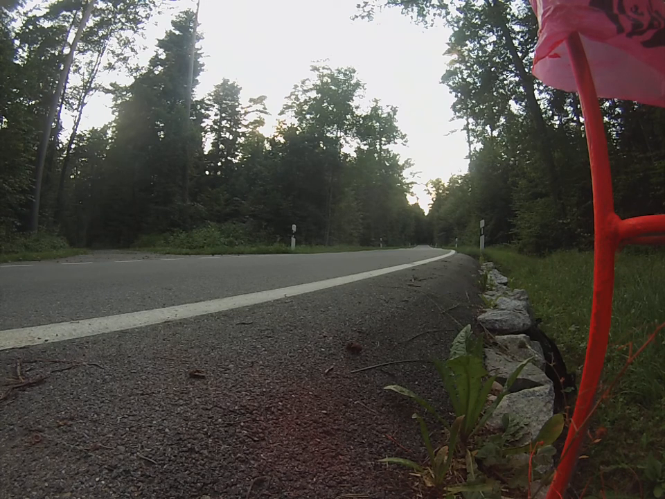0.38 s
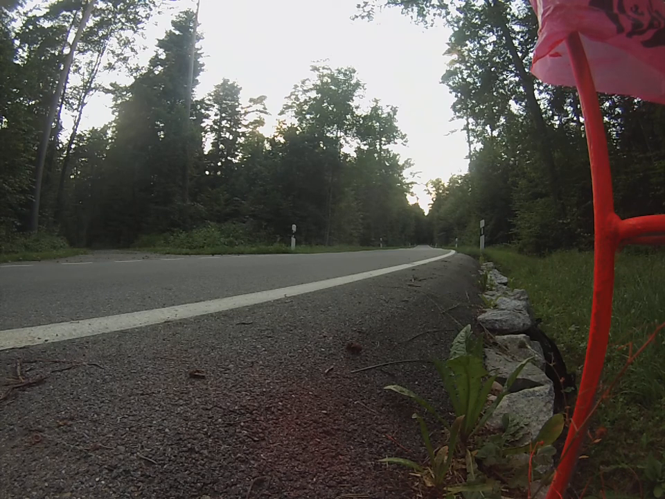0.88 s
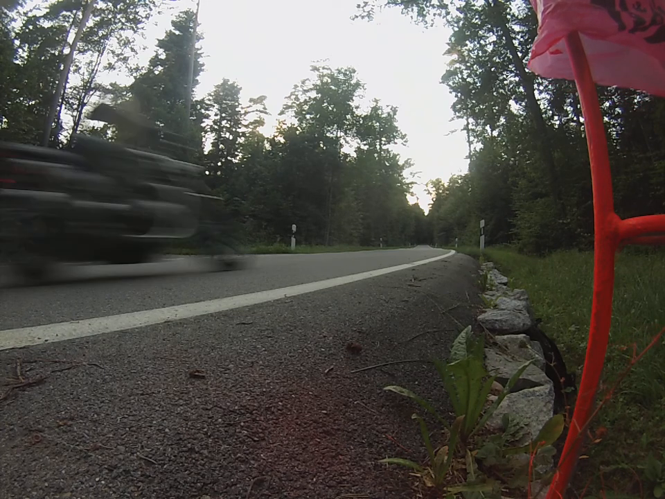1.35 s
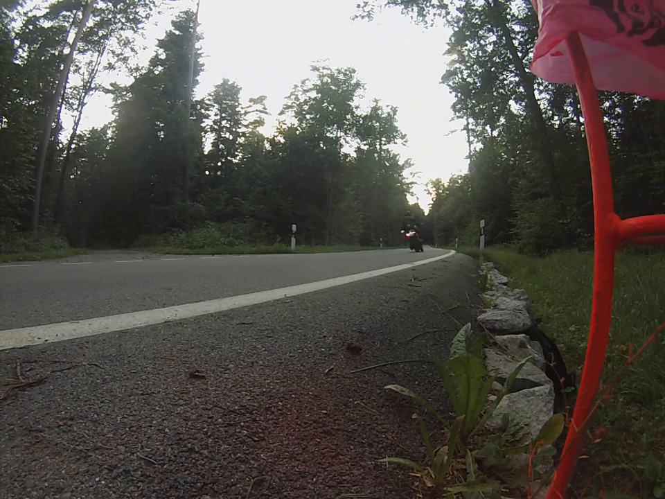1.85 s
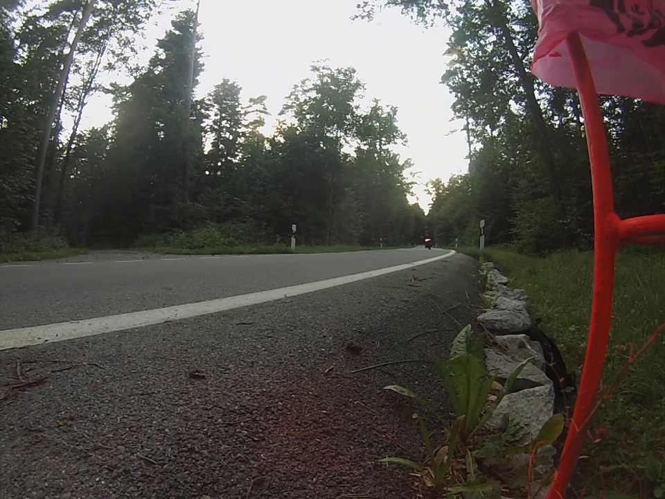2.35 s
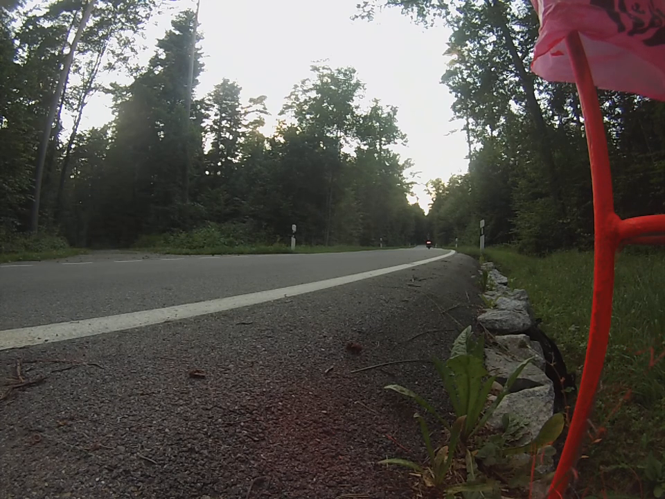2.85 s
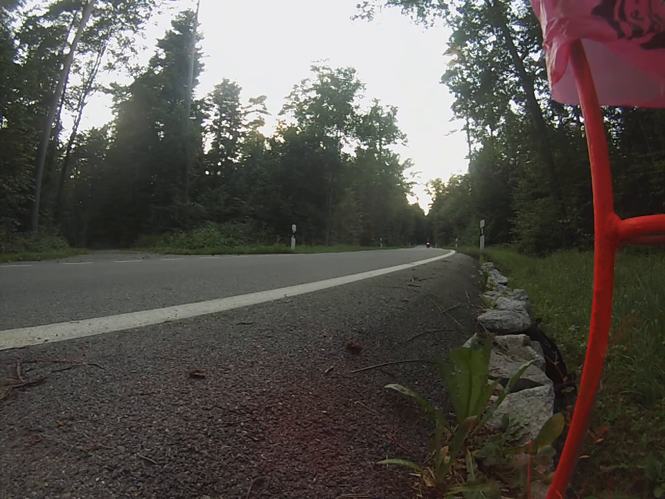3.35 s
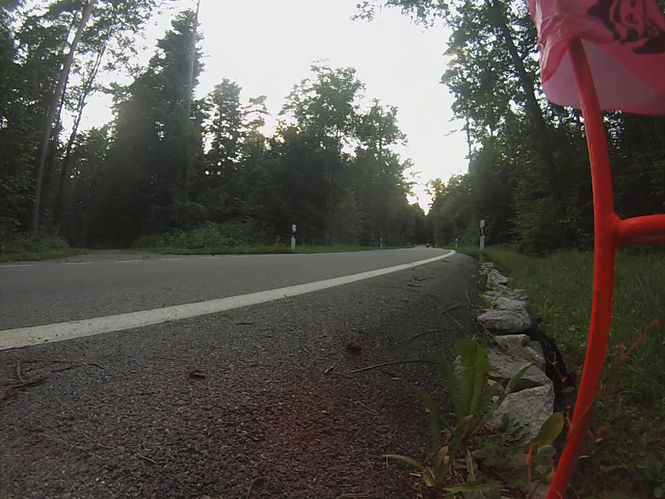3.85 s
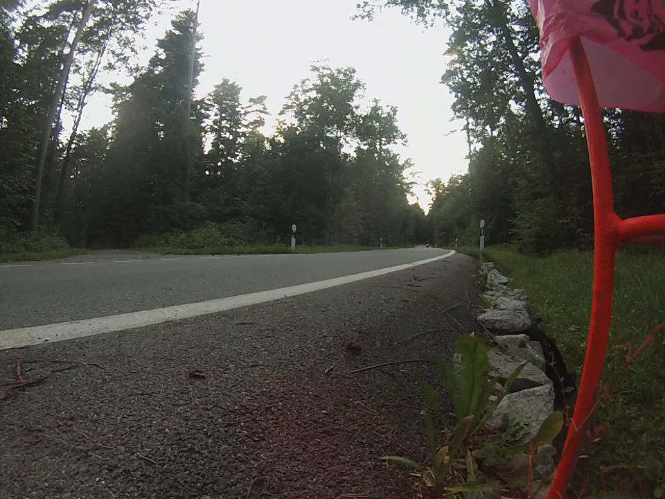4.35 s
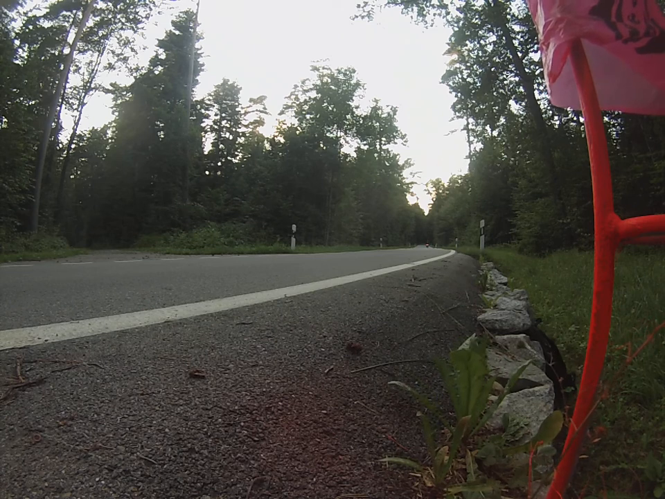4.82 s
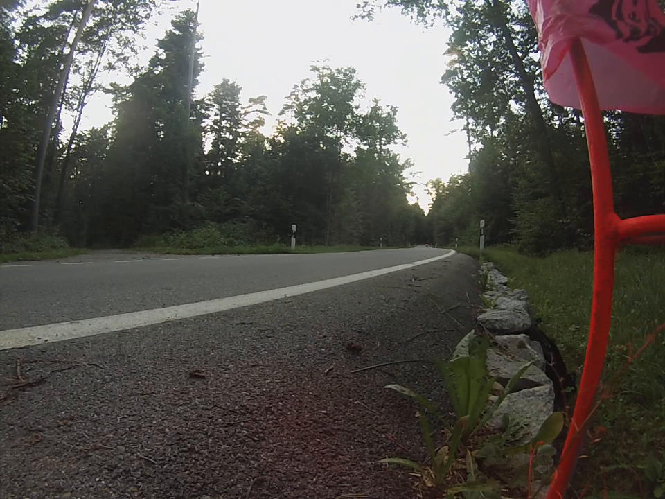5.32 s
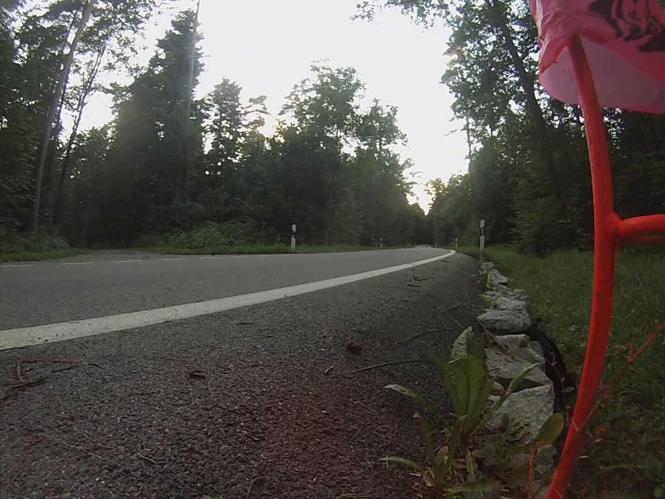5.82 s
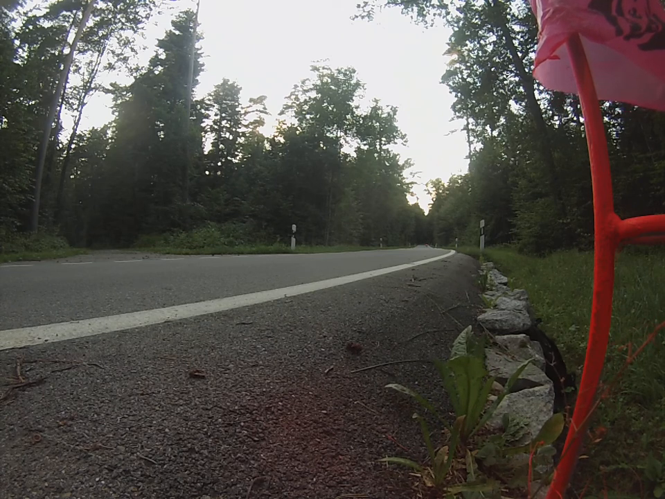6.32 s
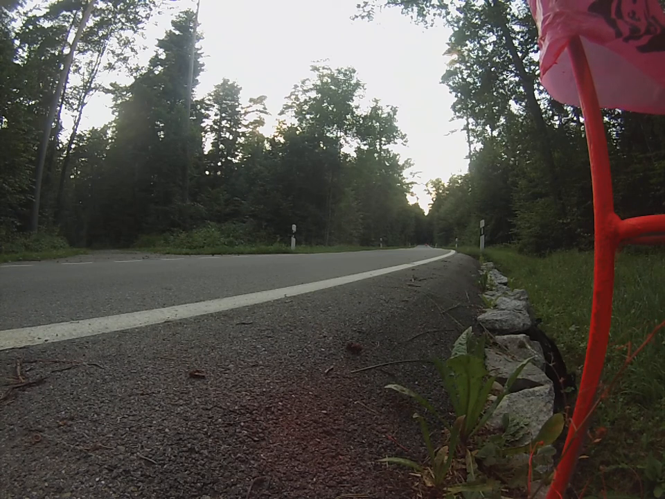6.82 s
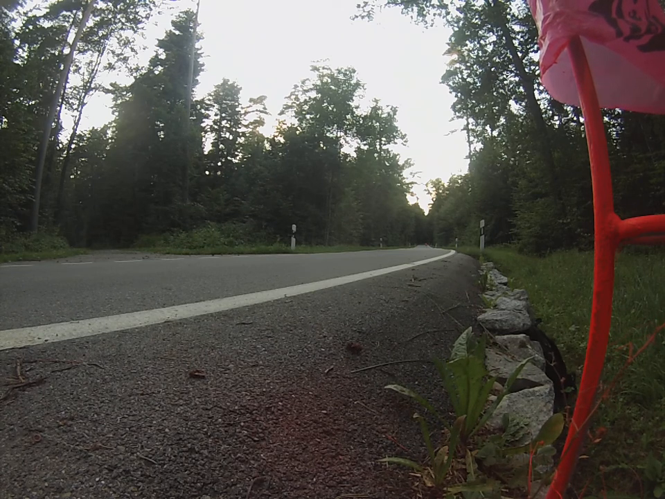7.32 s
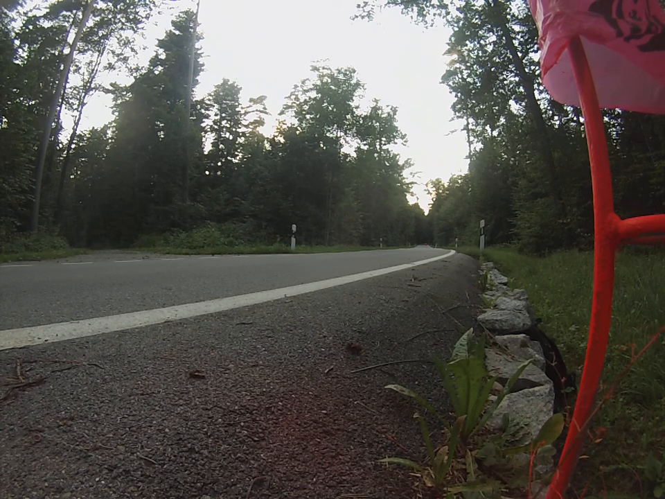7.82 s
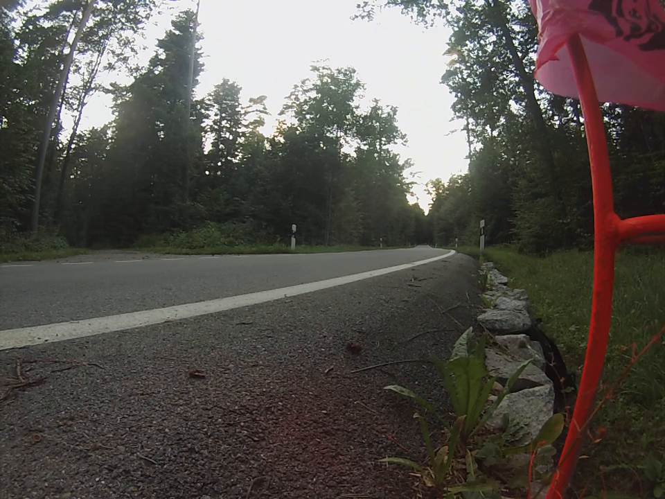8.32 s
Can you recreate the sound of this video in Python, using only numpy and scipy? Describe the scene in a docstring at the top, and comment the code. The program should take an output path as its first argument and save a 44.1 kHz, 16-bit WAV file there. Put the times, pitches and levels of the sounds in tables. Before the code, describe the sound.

A twin-cylinder motorcycle accelerates close past on a forest road, booming and hissing, changes gear and fades into the distance among the trees.

```python
"""A forest road, microphone at the verge: a two-cylinder motorcycle accelerates past, changes gear and rides off.
Two unevenly spaced firings per cycle shape a boom of engine-order sines and ring the pipe tip in sharp cracks.
Tyres, chain and valves hiss in narrow noise bands; near sines make a drive whine that follows road speed.
Low swells and gusts of air thump the microphone, the trees send back a dull decaying echo,
faint dry ticks are heard close by, and a bird whistles once, far back."""
import sys
import numpy as np
from scipy import signal
from scipy.io import wavfile
from scipy.ndimage import uniform_filter1d

SR = 44100
rng = np.random.default_rng(int(sys.argv[2]) if len(sys.argv) > 2 else 0)


def voltage_ratio(level):
    """Linear amplitude factor for a level in decibels (scalar or array-like)."""
    return 10 ** (np.asarray(level, float) / 20)


def inscribe(sig):
    """Save sig as 16-bit PCM at rate SR to the path in sys.argv[1].

    A 1-D sig is mono; a 2-D sig holds one channel per row.
    Samples are clipped to [-1, 1] before scaling.
    """
    pcm = np.round(np.clip(np.atleast_2d(sig).T, -1, 1) * 32767)
    wavfile.write(sys.argv[1], SR, pcm.astype(np.int16))


N = 382788
TIME_S = np.arange(N) / SR

# exhaust boom as it reaches the roadside: time_s, level_db
BOOM_LEVEL = [(0.0, -22), (0.14, -22.5), (0.87, -17), (1.11, -12), (1.14, -12.5), (1.45, -15.5),
              (1.59, -21), (1.96, -23.5), (2.34, -23), (2.97, -25), (3.26, -30.5), (3.55, -28),
              (5.25, -32.5), (5.66, -34.5), (6.33, -41), (8.49, -44.5), (8.51, -47), (8.68, -41.5)]
# reference level of the running noise as it reaches the roadside: time_s, level_db
RUNNING_LEVEL = [(0.0, -38), (0.65, -33.5), (1.09, -26), (1.2, -24.5), (1.37, -21), (1.42, -25.5),
                 (1.5, -30), (1.65, -38.5), (1.98, -41.5), (2.29, -37), (2.68, -29), (2.85, -32.5),
                 (3.24, -34), (3.6, -33), (5.56, -35.5), (5.78, -39), (7.11, -46), (8.68, -49.5)]
# engine speed on the bike: time_s, cycles_per_s
ENGINE_REVS = [(0.0, 23.497), (0.7, 24.698), (1.4, 25.251), (2.76, 26.526), (3.0, 24.263), (3.2, 21.849),
               (3.3, 20.925), (3.46, 23.347), (3.6, 22.791), (4.2, 22.889), (5.6, 24.214), (6.1, 23.672),
               (6.55, 23.584), (6.72, 22.799), (7.25, 22.743), (8.2, 21.507), (8.68, 20.74)]

# moment of the pass, road speed, distance from microphone to the bike's line
PASS_S, SPEED_M_S, MISS_M = 1.422, 19.42, 1.41
FIRST_FIRING, SECOND_FIRING = .155, .375   # shares of a cycle; the second counts from the first


def rms_one(x):
    """Scale to rms 1."""
    return x / np.sqrt(np.mean(x ** 2) + 1e-20)


def in_time(rows):
    """Columns of a table at every sample."""
    s, *columns = np.transpose(rows)
    return [np.interp(TIME_S, s, c) for c in columns]


def at_hz(points, hz):
    """A spectrum read on a log-frequency axis."""
    points_hz, points_db = np.transpose(points)
    return np.interp(np.log(hz), np.log(points_hz), points_db)


def drift(rate_hz):
    """Slow chance of spread 1: noise through two equal low-pass poles, drawn every 40 samples."""
    r = np.exp(-2 * np.pi * rate_hz * 40 / SR)
    slow = signal.lfilter([1], [1, -2 * r, r * r], rng.standard_normal(N // 40 + 2002))[2000:]
    return np.interp(np.arange(N) / 40, np.arange(len(slow)), rms_one(slow))


def band(x, low_hz, high_hz):
    """Second-order band-pass."""
    return signal.sosfilt(signal.butter(2, [low_hz, high_hz], "band", fs=SR, output="sos"), x)


def resonate(x, modes):
    """Parallel resonances that start as a sine at each push."""
    out = 0
    for hz, width_hz, db in modes:
        r, w = np.exp(-np.pi * width_hz / SR), 2 * np.pi * hz / SR
        push = (1 - r) * np.sin(w)
        out = out + voltage_ratio(db) * signal.lfilter([0, push], [1, -2 * r * np.cos(w), r * r], x + 1e-18)
    return out


def along_m():
    """Position on the road: negative before the pass, positive after it."""
    return SPEED_M_S * (TIME_S - PASS_S)


def distance_m():
    """Distance from bike to microphone."""
    return np.hypot(along_m(), MISS_M)


def receding():
    """Cosine of the riding direction seen from the microphone: -1 coming, +1 going."""
    return along_m() / distance_m()


def heard(rows):
    """Doppler: a rate on the bike, raised while it comes and lowered while it goes."""
    sound_m_s = 343
    return in_time(rows)[0] / (1 + SPEED_M_S / sound_m_s * receding())


def views():
    """Shares of the five views of the bike: ahead, alongside, behind, next gear, far."""
    turn_power = 5.9   # higher keeps the side view longer around the pass
    shift_s, shift_ramp_s, far_s, far_ramp_s = 3.49, 0.97, 6.34, 1   # middle and length of each crossfade
    going = receding()
    shifted = np.clip((TIME_S - shift_s) / shift_ramp_s + .5, 0, 1)
    far = np.clip((TIME_S - far_s) / far_ramp_s + .5, 0, 1)
    ahead = np.maximum(-going, 0) ** turn_power
    behind = np.maximum(going, 0) ** turn_power - shifted
    shares = np.array([ahead, np.zeros(N), behind, shifted - far, far])
    shares[1] = 1 - shares.sum(axis=0)
    return shares


def shut():
    """How far the throttle is closed, 0-1."""
    # throttle, shut for the gear change, eased off before the bend: time_s, opening (0-1)
    throttle = [(0, 0.84), (2.25, 0.93), (2.4, 1.01), (2.8, 0.88), (2.87, 0.1), (3.28, 0), (3.34, 0.24),
                (3.43, 0), (3.47, 0.61), (5.62, 0.7), (5.74, 0.38), (8.68, 0.44)]
    return 1 - np.clip(in_time(throttle)[0], 0, 1)


def unevenness():
    """Firings grow uneven as the throttle closes."""
    steady, shut_adds = .03, .45   # unevenness, 0-1
    uneven_below = .5   # throttle opening
    return steady + shut_adds * np.clip(1 - (1 - shut()) / uneven_below, 0, 1)


def balance():
    """Lowest orders, bark and crack in dB, from view, revs and throttle: load lifts the rising orders."""
    # rows: ahead, alongside, behind, next gear, far
    # columns: lowest_orders_db above boom, bark_db above boom, crack_db above the running reference
    by_view = [(-19.5, -4, -25), (-12.5, -5.5, -2), (-11, -6, 0), (-16.5, 0.5, -1), (-14.5, -3.5, -17)]
    boom_revs, deep_top_revs = 24, 25   # cycles per s: reference, and where the lowest orders stop rising
    deep_db_per_rev, bark_db_per_rev = 5, 2
    shut_deep_db, shut_bark_db, shut_crack_db = 5, -8, -15   # added with the throttle closed
    shares, closed, revs = views(), shut(), in_time(ENGINE_REVS)[0]
    deep_db, bark_db, crack_db = np.transpose(by_view) @ shares
    load = (1 - closed) * (1 - shares[4])
    deep_rise = np.minimum(revs, deep_top_revs) - boom_revs
    deep_db = deep_db + deep_db_per_rev * load * deep_rise + shut_deep_db * closed
    bark_db = bark_db + bark_db_per_rev * load * (revs - boom_revs) + shut_bark_db * closed
    return deep_db, bark_db, crack_db + shut_crack_db * closed


def firings(spread_db):
    """Samples and strengths of the firings: a short gap, then a long one, in every cycle."""
    turns, uneven = np.cumsum(heard(ENGINE_REVS)) / SR, unevenness()
    whole = np.arange(int(turns[-1]))
    luck = rng.standard_normal((2 * len(whole), 2))
    wanted = np.sort(np.r_[whole, whole + SECOND_FIRING]) + FIRST_FIRING
    at = np.interp(wanted, turns, np.arange(N))
    rough = uneven[at.astype(int)]
    at = np.clip(at + rough * .003 * SR * luck[:, 0], 0, N - 2)   # 3 ms times unevenness
    return at, voltage_ratio(spread_db * rough * luck[:, 1]) * np.resize([1, .85], len(at))


def exhaust():
    """Engine orders as sines, phased as two firings a cycle, each followed by its pipe echo."""
    # pipe, setting the phases of the orders; columns: from_ahead, from_behind, next_gear
    # rows: strengths of first firing, its echo, second firing, its echo; pipe round trip s; suction delay s
    pipe = [(.9, 1, 1), (.7, .5, .3), (1, .98, .85), (1.05, .5, 1.15), (.0070, .00775, .0078),
            (.0045, .0054, .0045)]
    # engine orders, relative levels in each view: multiple of the cycle rate, level_db
    orders_ahead = [(1, -40), (2, -3.5), (3, -10), (4, -28.5), (5, -1.5), (6, -3), (7, -16.5), (8, -10),
                    (9, -8), (10, -9.5), (11, -3), (12, -17), (13, -10.5), (14, -17.5), (15, -26),
                    (16, -17.5), (17, -18.5), (18, -19), (19, -19), (20, -25.5), (21, -21), (22, -24)]
    orders_behind = [(1, -25), (2, -5.5), (3, -2), (4, -26), (5, -1.5), (6, -5), (7, -13.5), (8, -12),
                     (9, -9.5), (10, -9), (11, -6.5), (12, -17), (13, -12), (14, -14.5), (15, -28),
                     (16, -12.5), (17, -18.5), (18, -28), (19, -13.5), (20, -22), (21, -20), (22, -27)]
    orders_next_gear = [(1, -28), (2, -12), (3, -14), (4, -23), (5, -1.5), (6, 0), (7, -10), (8, -9),
                        (9, -20.5), (10, -16), (11, -7), (12, -20.5), (13, -6), (14, -10), (15, -19),
                        (16, -16.5), (17, -11.5), (18, -11), (19, -13), (20, -21), (21, -13.5), (22, -9)]
    orders_far = [(1, -27), (2, -18), (3, -12), (4, -27), (5, -7), (6, -10.5), (7, -8), (8, -2), (9, -3.5),
                  (10, -8.5), (11, -14), (12, -13), (13, -30), (14, -14), (15, -28), (16, -19), (17, -30),
                  (18, -13), (19, -20), (20, -24), (21, -44), (22, -29)]
    suction = .4   # share of each push that returns inverted from the open pipe end

    step = np.arange(0, N, 40)   # slow values are worked out every 40 samples
    per_s, shares = heard(ENGINE_REVS), views()[:, step]
    behind, later = (1 + receding()[step]) / 2, shares[3] + shares[4]
    blended = [a + (b - a) * behind + (c - b) * later for a, b, c in pipe]
    first, first_echo, second, second_echo, trip_s, suction_s = blended
    tables = [orders_ahead, orders_ahead, orders_behind, orders_next_gear, orders_far]
    levels_db = np.array([[db for k, db in table] for table in tables]).T @ shares
    boom_db = in_time(BOOM_LEVEL)[0][step]
    deep_db, bark_db = (c[step] for c in balance()[:2])
    groups = [(range(1, 4), boom_db + deep_db), (range(4, 8), boom_db), (range(8, 23), boom_db + bark_db)]
    depth = .035 + unevenness()[step]
    turn = np.exp(2j * np.pi * (np.cumsum(per_s) / SR - FIRST_FIRING))
    carrier, out = np.ones(N, complex), 0
    for orders, db in groups:
        total = np.sqrt(sum(voltage_ratio(levels_db[k - 1]) ** 2 for k in orders))
        for k in orders:
            hz = k * per_s[step]
            echo = np.exp(-2j * np.pi * hz * trip_s)
            late = np.exp(-2j * np.pi * k * SECOND_FIRING)
            # sudden rise, slower fall, undershoot
            pulse = 1j * hz / (10 + 1j * hz) / (65 + 1j * hz)
            pulse = pulse * (1 - suction * np.exp(-2j * np.pi * hz * suction_s))
            shape = pulse * (first + first_echo * echo + late * (second + second_echo * echo))
            wobble = depth * (drift(14)[step] + 1j * drift(14)[step]) * np.sqrt(k / 5)
            wobble_gain = np.sqrt(1 + 2 * depth ** 2 * k / 5)   # divided out to hold the level
            size = np.sqrt(2) * voltage_ratio(db + levels_db[k - 1]) / total / wobble_gain
            slow = size * (1 + wobble) * shape / np.abs(shape)   # only the phase of the shape counts
            carrier = carrier * turn
            out = out + (np.interp(np.arange(N), step, slow) * carrier).real
    return out


def cracks(at, strength):
    """The sharp front of each firing rings the pipe tip, mostly heard from behind; some are much sharper."""
    # pipe-tip resonances: pitch_hz, width_hz, level_db
    tip_modes = [(1873, 63, 1.5), (2260, 310, -14), (1030, 600, -9.5), (664, 250, -2)]
    fronts = np.zeros(N)
    fronts[at.astype(int)] = strength * voltage_ratio(np.clip(1.4 * rng.standard_normal(len(at)), -6, 6))
    # gas rasps for some 3 ms after the front
    rasp = signal.lfilter([1], [1, -np.exp(-1 / (.003 * SR))], fronts)
    fronts += .12 * rng.standard_normal(N) * rasp
    rung = band(band(resonate(fronts, tip_modes), 500, 3000), 400, 3500)
    return voltage_ratio(in_time(RUNNING_LEVEL)[0] + balance()[2]) * rms_one(rung)


def running(at, strength, puff_s, puff_db, patchy_db):
    """Tyre, chain and valve noise in narrow bands; its colour turns with the bike and puffs with each firing."""
    # spectra of the noise in each view, relative: pitch_hz, density_db (dB per Hz)
    from_ahead = [(220, -32), (380, -9), (457, -7.5), (585, -12), (942, -13), (1220, -6), (1340, -13),
                  (2230, -18), (3320, -10.5), (3880, -12.5), (4660, -53), (5440, -23), (9600, -50.5),
                  (12100, -47.5), (15000, -70)]
    from_side = [(260, -39), (450, -74), (612, -9), (884, -0.5), (1010, -3), (1090, 3), (1480, -1.5),
                 (1710, -6), (3510, -23), (5530, -8), (7640, -24.5), (11200, -32), (15000, -45)]
    from_behind = [(260, -32), (450, 0), (521, -31.5), (595, 7), (659, -15.5), (1020, -11), (1500, -19),
                   (1870, -16.5), (2780, -23.5), (6690, -29.5), (8220, -50.5), (12200, -52.5), (15000, -85)]
    in_next_gear = [(220, -28), (380, -1.5), (486, -13), (533, -21), (603, 5), (671, -9.5), (1360, -8),
                    (1540, -21.5), (1880, -14), (2890, -26), (6640, -36), (8110, -59.5), (15000, -67)]
    from_afar = [(220, -35), (380, 3), (443, 10.5), (501, 4.5), (558, 0.5), (603, 8.5), (885, 6),
                 (1450, -2), (1880, -4), (2760, -14), (11500, -50), (15000, -61)]
    # narrow rings in the noise, relative: pitch_hz, width_hz, level_db
    rings_ahead = [(1220, 45, 3), (5320, 280, -13), (7420, 250, -23.5), (11300, 900, -44)]
    rings_behind = [(3345, 54, -3.5), (1840, 86, 3)]
    treble_loss = 0.49   # dB of treble lost per dB of spreading
    shut_treble_db = -8

    going, shares = receding(), views()
    treble_db = shut_treble_db * shut() - treble_loss * 20 * np.log10(distance_m())
    # the treble swings around what each view gives on average
    usual_db = np.array([np.average(treble_db, weights=s + 1e-9) for s in shares]) @ shares
    swing_db = treble_db - usual_db

    clicks = np.zeros(N)
    clicks[at.astype(int)] = strength * voltage_ratio(np.clip(3 * rng.standard_normal(len(at)), -6, 5))
    puffs = signal.lfilter([1], [1, -np.exp(-1 / (puff_s * SR))], clicks)
    puffs = uniform_filter1d(uniform_filter1d(puffs, size=40), size=40)   # swells within two milliseconds
    gate = rms_one(1 + voltage_ratio(puff_db) * puffs * (0.49 + 0.21 * (going > 0)))

    spectra = [from_ahead, from_side, from_behind, in_next_gear, from_afar]
    white, edges, hiss = rng.standard_normal((2, N)), 400 * 2 ** np.arange(0, 5.3, .2), 0
    for k, (low, high) in enumerate(zip(edges, edges[1:])):
        hz = np.sqrt(low * high)
        colour_db = np.array([at_hz(v, hz) - at_hz(v, 1054) for v in spectra]) @ shares
        tilt_db = np.clip(np.log2(hz / 1500), 0, 1.1) * swing_db
        narrow = band(band(white[k % 2], low, high), low / 1.2, high * 1.2)   # neighbours use separate noises
        hiss = hiss + voltage_ratio(colour_db + tilt_db + patchy_db * drift(8)) * narrow
    rings = voltage_ratio(-17.5) * shares[0] * rms_one(resonate(rng.standard_normal(N), rings_ahead))
    after = 0.23 * shares[2] + shares[3] + 0.5 * shares[4]
    rings += voltage_ratio(-25 + swing_db) * after * rms_one(resonate(rng.standard_normal(N), rings_behind))
    return voltage_ratio(in_time(RUNNING_LEVEL)[0] + 12.5) * gate * (hiss + rings)


def whine():
    """Drive whine that follows road speed: near sines that waver in level."""
    # base pitch of the whine on the bike: time_s, pitch_hz
    base_pitch = [(0, 571), (1.4, 610), (2.76, 640), (3.45, 621), (5.7, 667), (6.2, 665), (7, 632),
                  (8.68, 574)]
    # level of the whine, before the offset of each part: time_s, level_db
    whine_level = [(0, -46.5), (.9, -40.5), (1.45, -27), (1.7, -41), (2.7, -31), (2.83, -46), (2.92, -28.5),
                   (3.04, -39), (3.12, -49), (3.25, -36.5), (3.5, -37), (3.7, -43.5), (5.6, -46.5),
                   (5.9, -42), (6.8, -40), (7.1, -41), (7.4, -44.5), (8.68, -53)]
    # parts of the whine: multiple of the base pitch, coming_db, going_db, far_db
    parts = [(1, -0.5, -0.5, -0.5), (1.56, -18, -18, -9), (1.33, -20, -20, -20), (1.215, -4, -25, -25)]
    turns = np.cumsum(heard(base_pitch) + 1.5 * drift(10)) / SR
    shares, tones = views(), 0
    for multiple, coming_db, going_db, far_db in parts:
        part_db = going_db + (coming_db - going_db) * shares[0] + (far_db - going_db) * shares[4]
        tones = tones + voltage_ratio(part_db + 0.74 * drift(6.3)) * np.sin(2 * np.pi * multiple * turns)
    return np.sqrt(2) * voltage_ratio(in_time(whine_level)[0]) * tones


def forest(x):
    """Trunks scatter the sound into a dull decaying tail."""
    t60_s, level_db, low_hz, cut_hz, swell_s = .9, -21, 62, 2200, 0.047
    t = np.arange(SR) / SR
    tail = band(rng.standard_normal(SR), low_hz, cut_hz) * voltage_ratio(-60 * t / t60_s) * np.minimum(t / swell_s, 1)
    return voltage_ratio(level_db) * signal.fftconvolve(x, tail / np.sqrt(np.sum(tail ** 2)))[:N]


def rumble():
    """Road roar between the engine orders: half-octave noise bands following the boom."""
    # spectrum of the roar, relative: pitch_hz, density_db (dB per Hz)
    roar = [(24, -45), (40, -34), (113, 13.5), (171, 25.5), (281, -14), (333, -32), (427, -16), (600, -13),
            (780, -40), (1320, -120)]
    white, edges = rng.standard_normal((2, N)), 40 * 2 ** np.arange(0, 4, .5)
    bands = 0
    for k, low in enumerate(edges):
        bands = bands + voltage_ratio(at_hz(roar, low * 1.19)) * band(white[k % 2], low, low * 2 ** .5)
    return voltage_ratio(in_time(BOOM_LEVEL)[0] - 20.0 + 3.9 * unevenness()) * rms_one(bands)


def low_thumps():
    """Lumpy lowest noise at the microphone: a low rumble that follows the boom, and sudden gusts."""
    # low swells and gusts of air at the microphone, before a 4 dB trim: peak_s, level_db
    gusts = [(1.04, -31), (1.45, -36), (2.86, -38), (3.05, -41), (3.17, -34), (3.27, -40), (3.47, -42),
             (3.84, -48), (4.15, -52)]
    rise_db_s, fall_db_s = 151, 45
    under_rumble_db, coming_db = -34, 15   # from the boom, before the trim; added in the view from ahead
    since_s = TIME_S - np.array(gusts)[:, :1]
    gusts_db = np.array(gusts)[:, 1:] + np.where(since_s < 0, rise_db_s, -fall_db_s) * since_s
    under_db = in_time(BOOM_LEVEL)[0] + under_rumble_db + coming_db * views()[0]
    level_db = np.maximum(gusts_db.max(axis=0), under_db)
    return voltage_ratio(level_db - 4 + 2.2 * drift(6)) * rms_one(band(rng.standard_normal(N), 18, 60))


def microphone_hiss():
    """Steady faint noise of the microphone."""
    return voltage_ratio(-70) * rms_one(band(rng.standard_normal(N), 300, 8200))


def ticks():
    """Faint dry ticks close by among the gusts: short dying bursts of bright noise."""
    # ticks, before a 5 dB trim: start_s, level_db
    tick_times = [(2.9277, -50), (2.975, -58), (3.1062, -54), (3.3208, -58), (3.3372, -50), (3.5014, -57)]
    s, db = np.transpose(tick_times)
    clicks = np.zeros(N)
    clicks[(s * SR).astype(int)] = voltage_ratio(db - 5)
    dying = signal.lfilter([1], [1, -np.exp(-1 / (0.0049 * SR))], clicks)   # 4.9 ms decay
    return dying * rms_one(band(rng.standard_normal(N), 3000, 14000))


def bird():
    """One faint level whistle from the trees: a near sine that swells and fades."""
    start_s, length_s, pitch_hz, level_db = 7.36, .13, 2725, -59
    swell = np.sin(np.pi * np.clip((TIME_S - start_s) / length_s, 0, 1))
    return voltage_ratio(level_db) * swell * np.sin(2 * np.pi * np.cumsum(pitch_hz + 12 * drift(20)) / SR)


def scene():
    """Bike, its echo from the trees, low thumps, ticks, bird and microphone hiss."""
    at, strength = firings(spread_db=7)
    noise = running(at, strength, puff_s=0.005, puff_db=0.0, patchy_db=1.1)
    bike = exhaust() + cracks(at, strength) + noise + whine()
    return (bike + forest(bike) + rumble() + low_thumps() + microphone_hiss() + ticks() + bird())[None]


def low_pass(x):
    """Removes everything above the highest recorded frequency."""
    return signal.sosfilt(signal.butter(12, 15190, fs=SR, output="sos"), x)


def record(dry):
    """The finished mix, its peaks softly rounded."""
    mix = 1.255 * np.tanh(dry / 1.29)
    return low_pass(mix)


dry = scene()
out = record(dry)
inscribe(out)
```